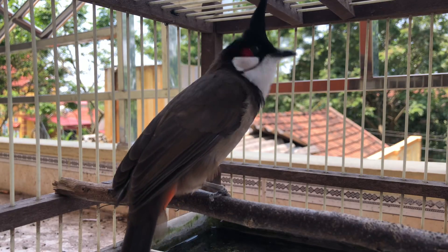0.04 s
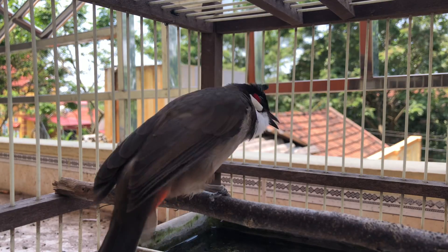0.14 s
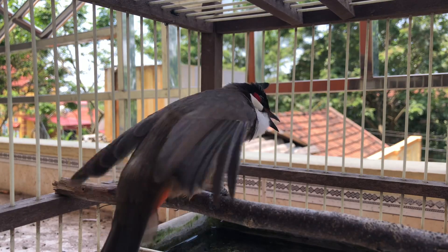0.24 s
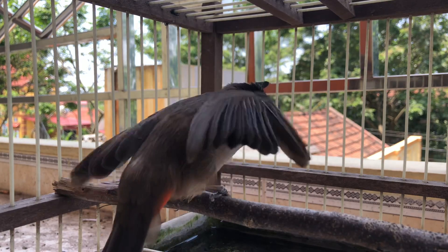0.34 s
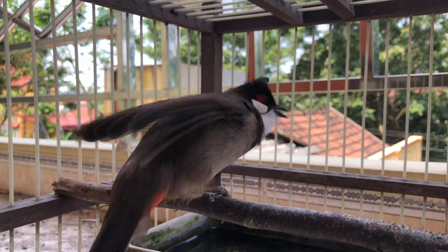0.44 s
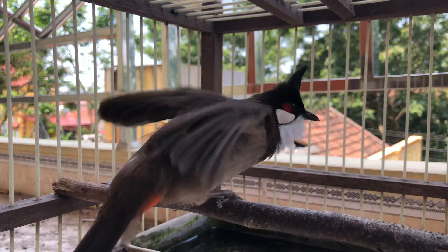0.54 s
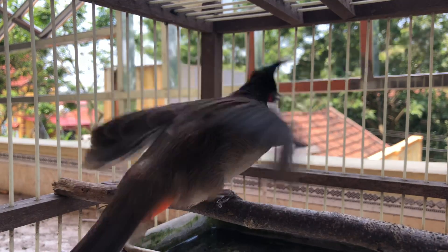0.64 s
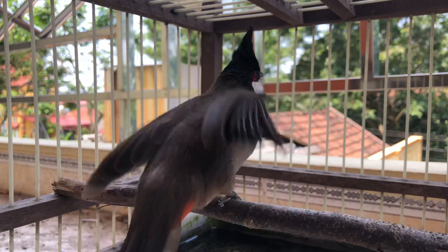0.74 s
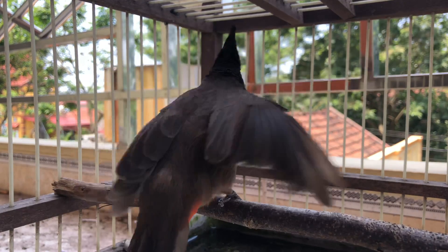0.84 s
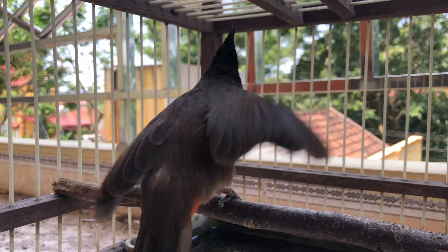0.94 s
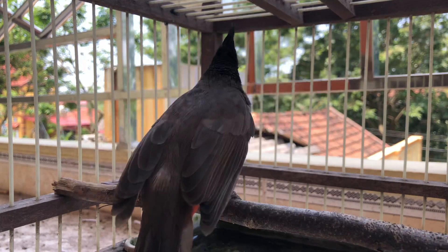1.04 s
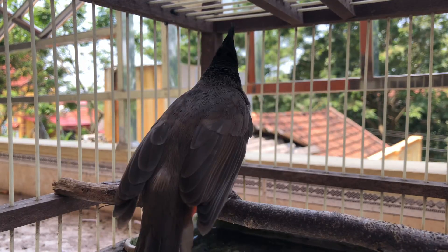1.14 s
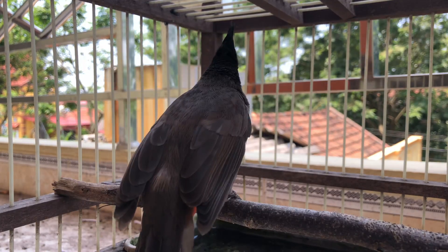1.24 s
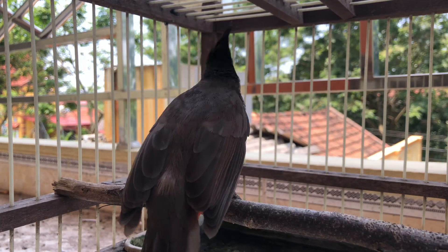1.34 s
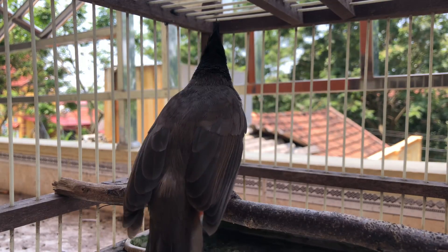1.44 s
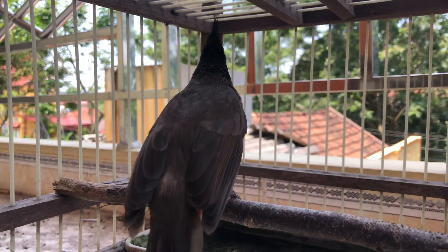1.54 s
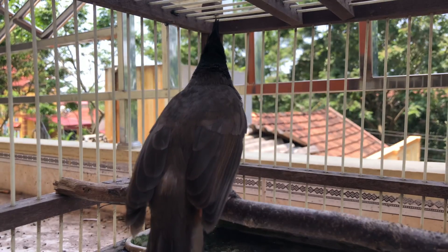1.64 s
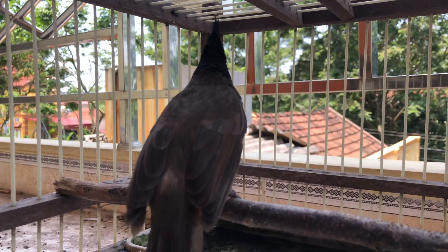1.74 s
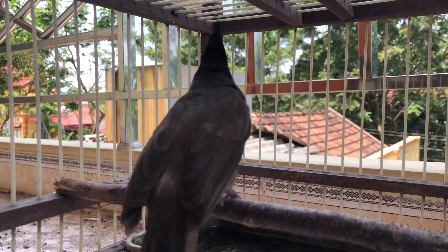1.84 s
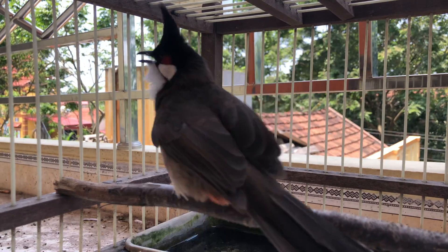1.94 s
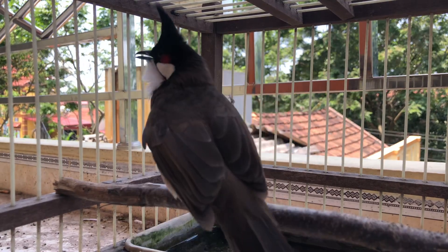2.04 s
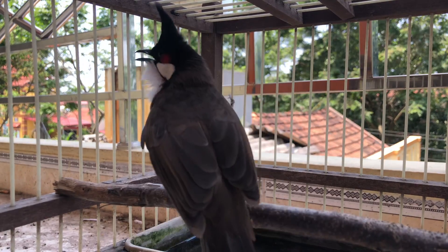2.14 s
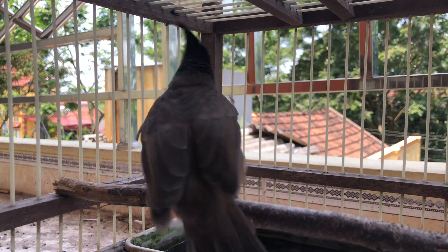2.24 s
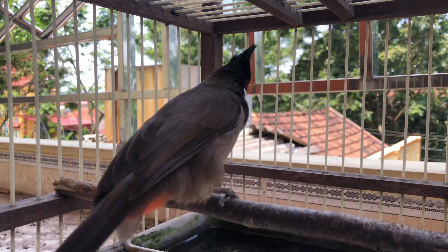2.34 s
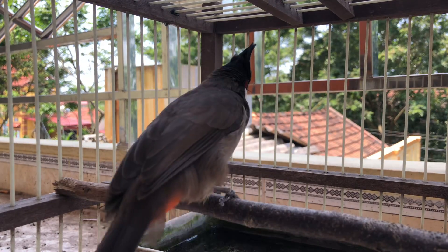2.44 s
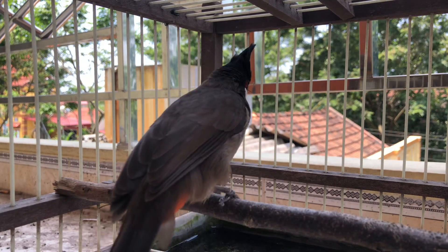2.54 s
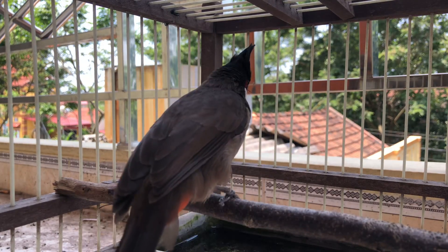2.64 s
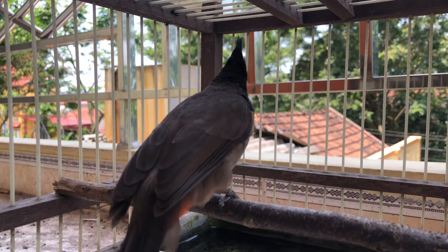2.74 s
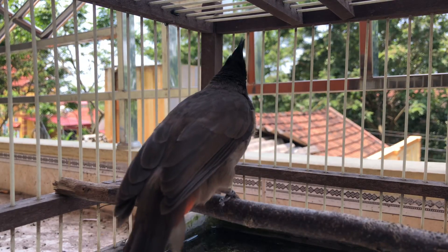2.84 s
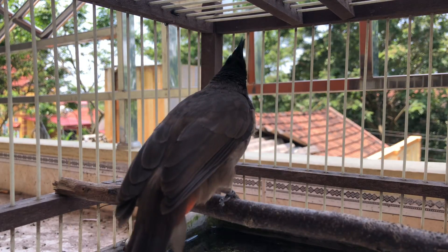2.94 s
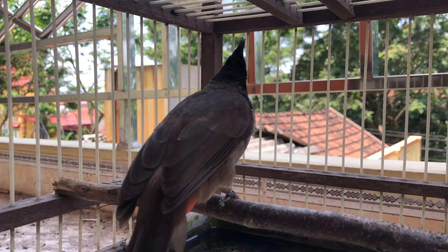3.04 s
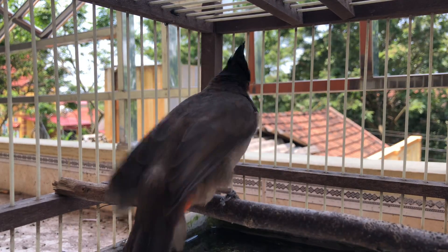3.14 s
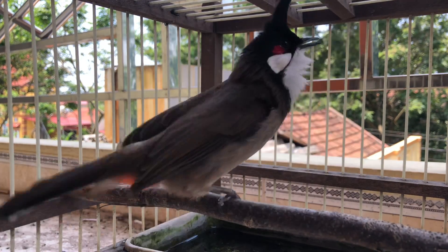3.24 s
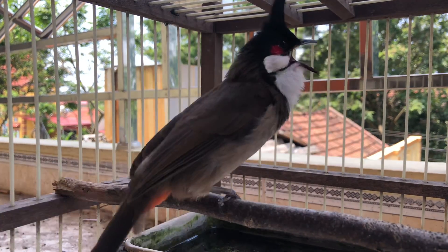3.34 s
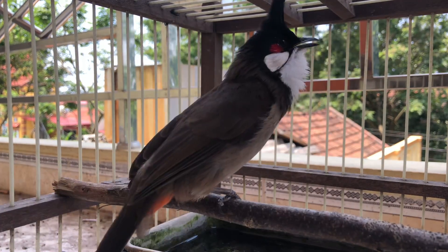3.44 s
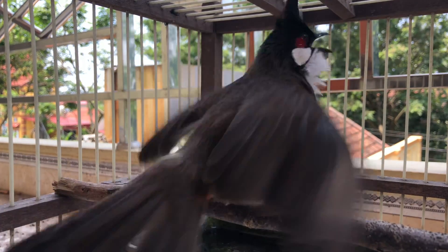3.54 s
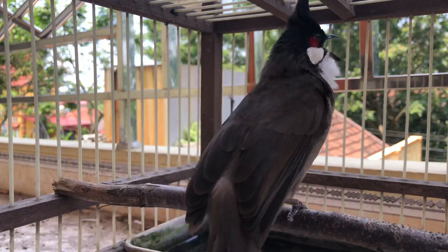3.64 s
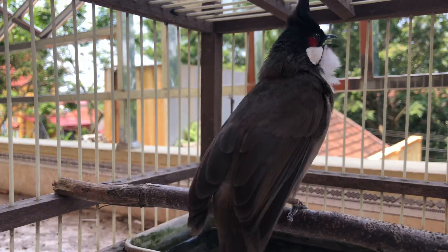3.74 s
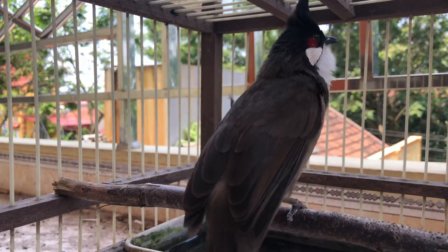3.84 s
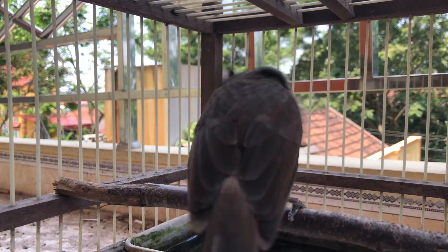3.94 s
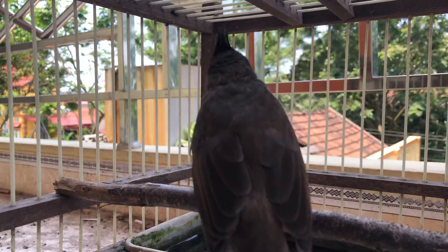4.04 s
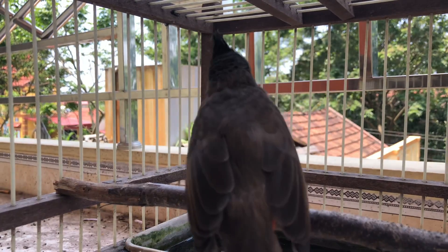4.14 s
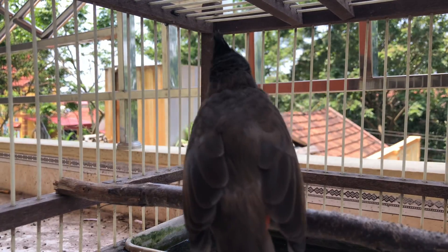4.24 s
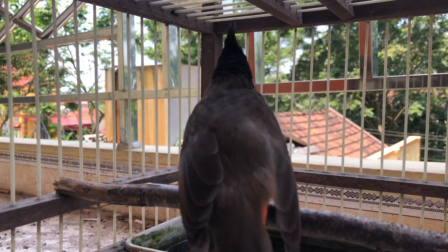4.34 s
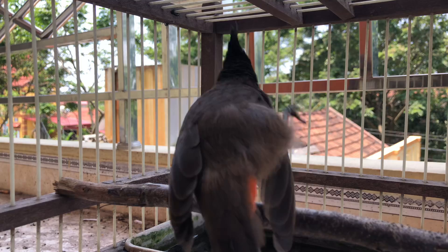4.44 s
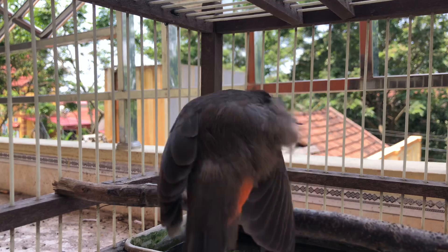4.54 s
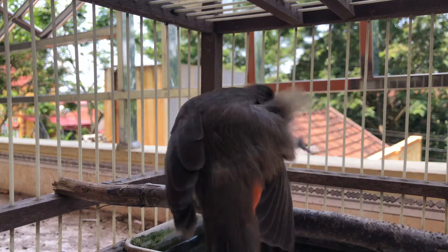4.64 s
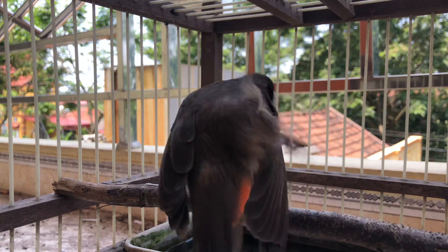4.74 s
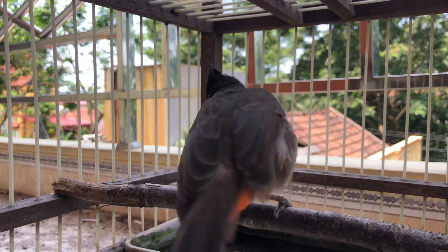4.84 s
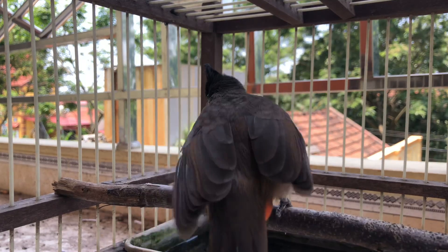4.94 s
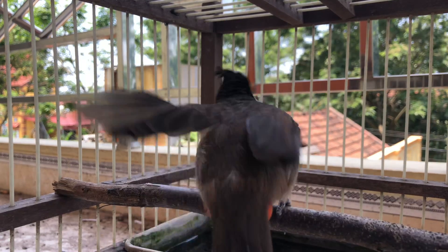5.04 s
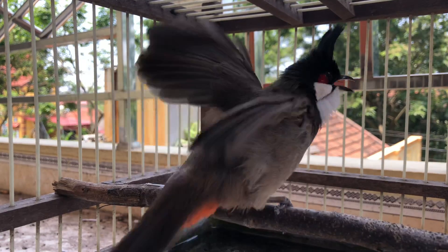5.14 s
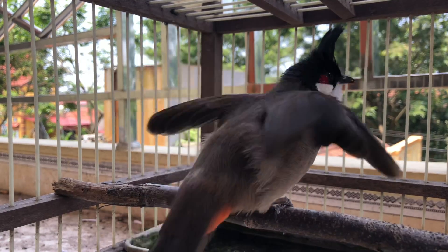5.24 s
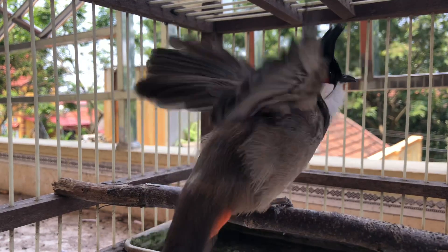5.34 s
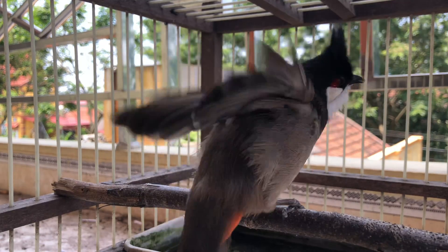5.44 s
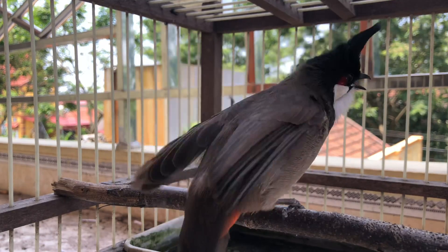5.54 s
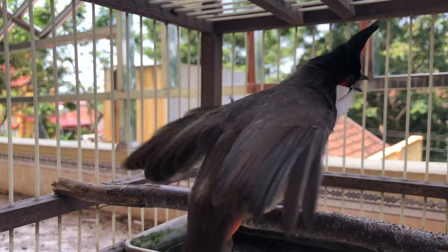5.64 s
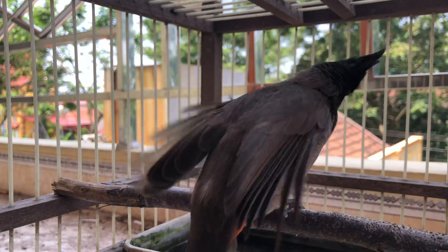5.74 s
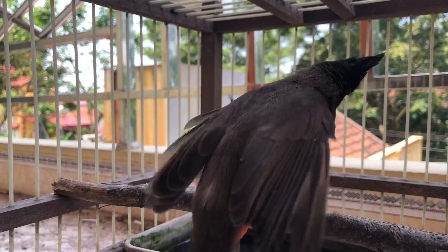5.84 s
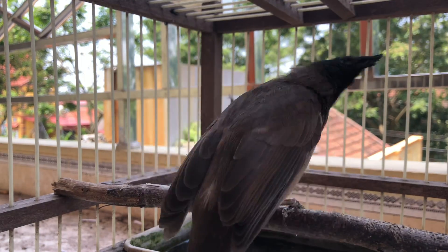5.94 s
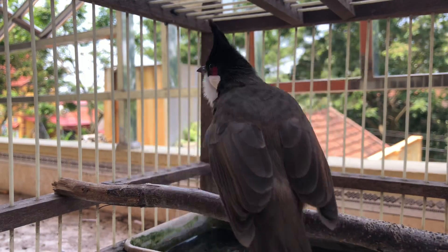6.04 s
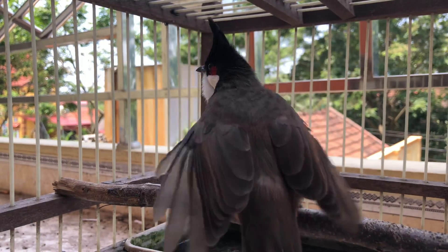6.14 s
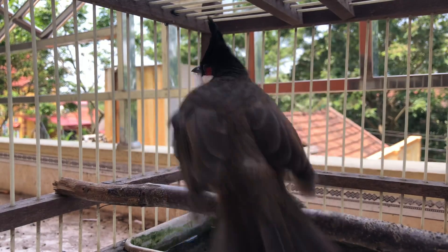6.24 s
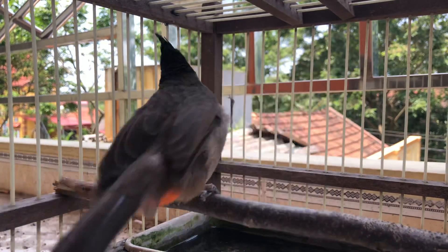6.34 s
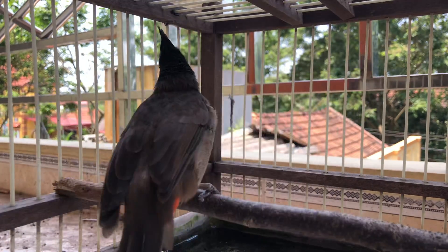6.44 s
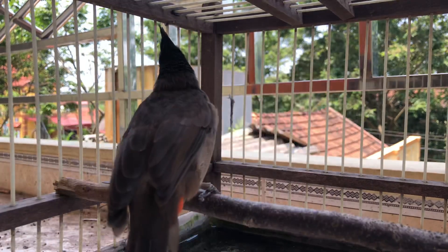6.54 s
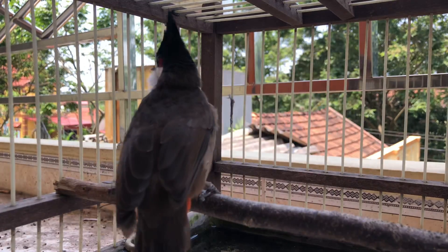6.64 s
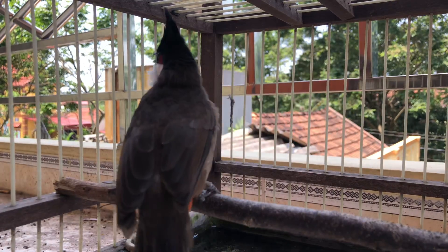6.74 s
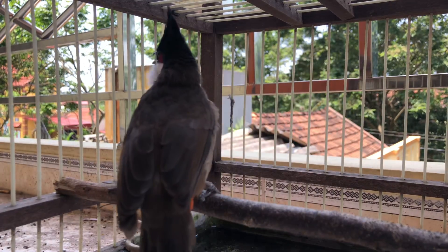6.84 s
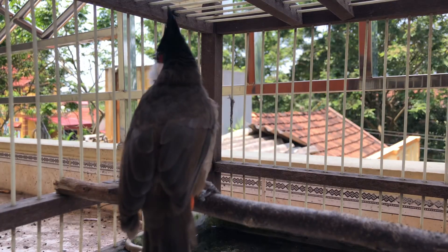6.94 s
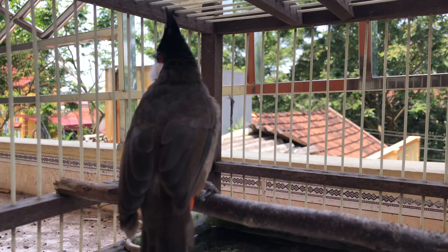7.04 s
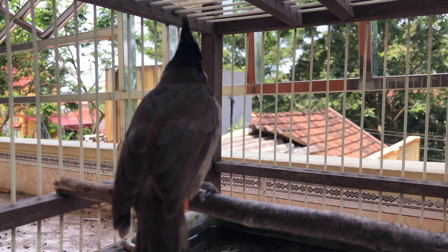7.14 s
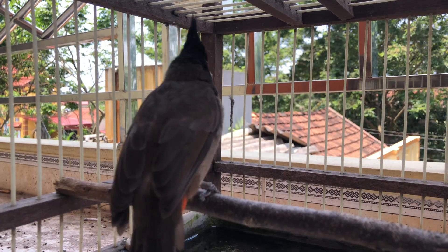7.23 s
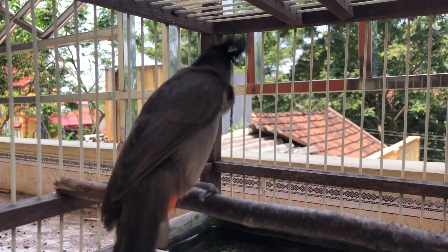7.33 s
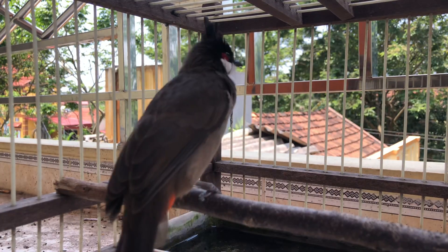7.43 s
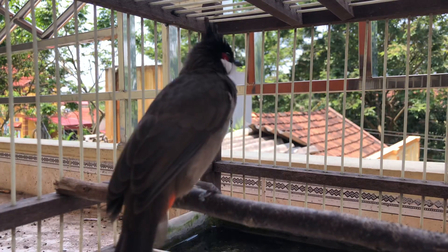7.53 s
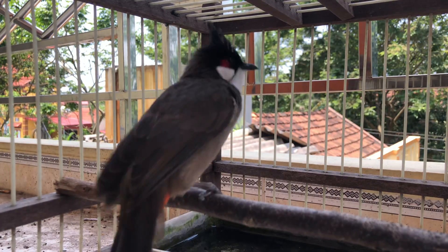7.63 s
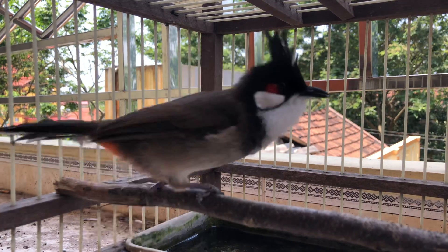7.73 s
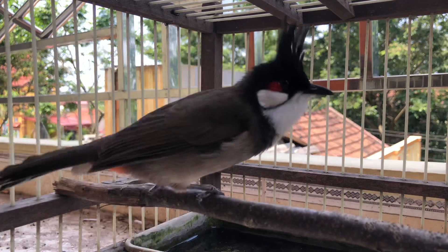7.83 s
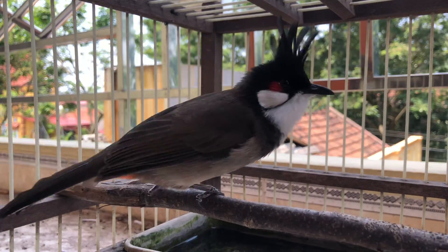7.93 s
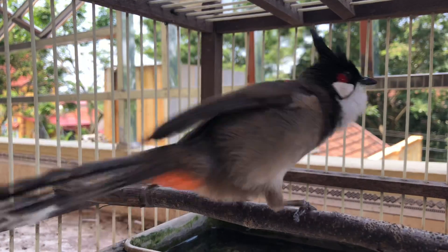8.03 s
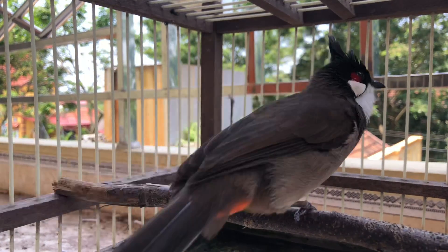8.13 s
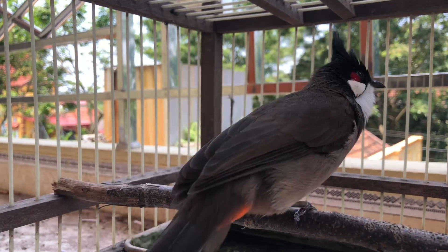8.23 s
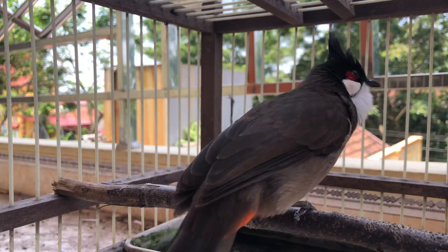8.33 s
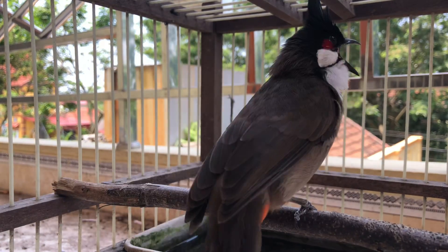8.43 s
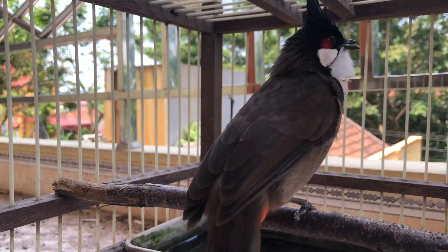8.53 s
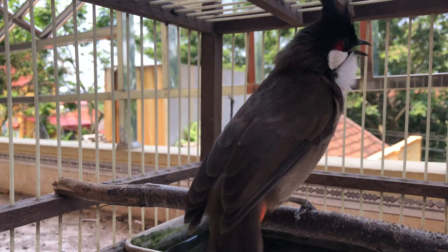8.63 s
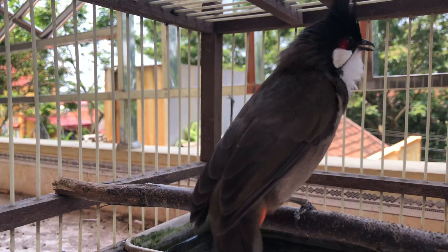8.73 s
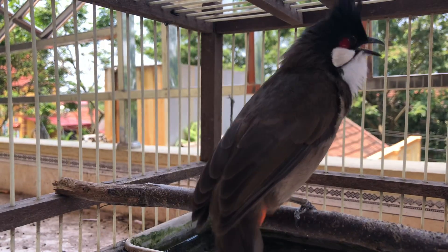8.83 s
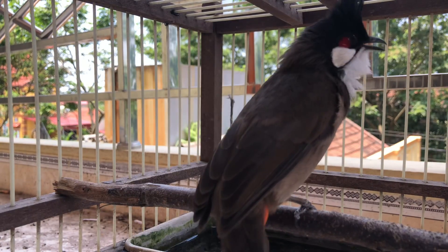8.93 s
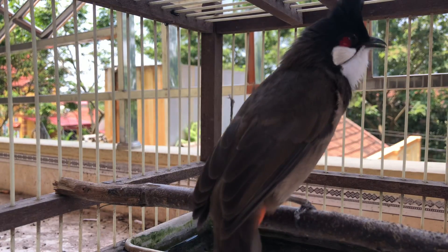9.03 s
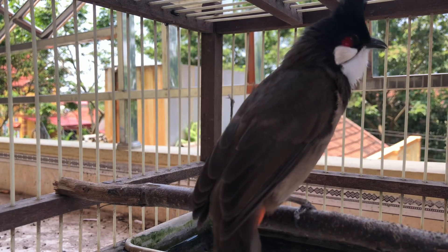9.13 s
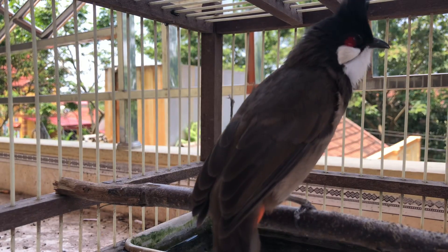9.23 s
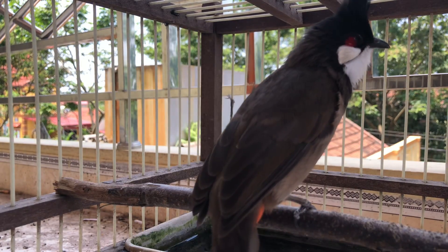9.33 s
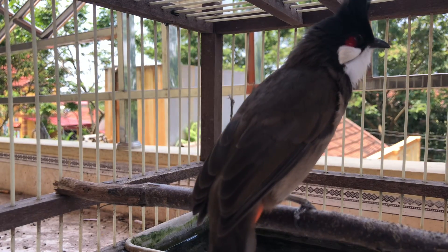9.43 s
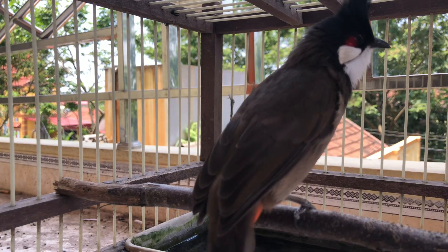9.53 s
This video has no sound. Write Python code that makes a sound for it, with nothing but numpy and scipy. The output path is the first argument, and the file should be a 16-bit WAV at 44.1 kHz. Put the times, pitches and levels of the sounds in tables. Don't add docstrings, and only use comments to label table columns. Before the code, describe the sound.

Short, clear, nearly pure bird whistles with a fluttering rasp, loud and close, throw quick echoes off nearby walls. Three similar phrases at about three, six and a half and eight and a half seconds stand out from quieter chucks, slides and squeaks. Dry feather and claw rustles and low air thumps come from the cage. Behind are reverberant distant birds, an early faint cockerel crow, soft leaves and a very low town murmur.

```python
import sys
import numpy as np
from scipy import signal
from scipy.fft import rfft, irfft, next_fast_len
from scipy.io import wavfile
from scipy.ndimage import uniform_filter1d, minimum_filter1d, map_coordinates

SR = 44100
rng = np.random.default_rng(int(sys.argv[2]) if len(sys.argv) > 2 else 0)


def how_loud(loudness_db):
    steps = np.asarray(loudness_db, float) / 20
    return 10 ** steps


def output_pcm(signal):
    pcm = np.clip(np.atleast_2d(signal).T, -1, 1) * 32767
    wavfile.write(sys.argv[1], SR, np.round(pcm).astype(np.int16))


N = 422478


def unit(x):
    return x / np.sqrt(np.mean(x ** 2) + 1e-20)


def along(points, hz):
    f, v = np.transpose(points)
    return np.interp(np.log(hz + 1), np.log(f + 1), v)


def wobble(rate, size):
    knots = rng.standard_normal(int(size * rate / SR) + 4)
    return map_coordinates(knots, [np.arange(size) * rate / SR])


def coloured(spectrum, size=N):
    m = next_fast_len(size)
    white = rfft(rng.standard_normal(m))
    return unit(irfft(white * how_loud(along(spectrum, np.fft.rfftfreq(m, 1 / SR))), m)[:size])


def add(track, s, sound):
    part = track[round(s * SR):][:len(sound)]
    part += sound[:len(part)]


# (frequency [Hz], level per Hz [dB])
HUM = [(20, -13), (42, -4), (99, 1), (228, -11), (500, -22), (1000, -45)]
# (time [s], level [dB])
TOWN = [(0, -56), (.7, -59), (1.1, -56.5), (2, -58.5), (3.1, -53.5), (3.8, -58.5), (5.1, -54.5),
        (5.9, -54.5), (6.8, -57.5), (8.1, -55), (8.7, -57.5), (9.58, -56.5)]
# (frequency [Hz], level per Hz [dB])
LEAVES = [(150, -40), (330, -22), (650, -21), (1500, -20), (2390, -19), (5000, -27), (8000, -36),
          (15800, -45)]


def town():
    s, db = np.transpose(TOWN)
    swell_db = np.interp(np.arange(N) / SR, s, db) + 1.4 * wobble(7, N) + wobble(1.5, N)
    leaves_db = -62 + wobble(3, N)
    return how_loud(swell_db) * coloured(HUM) + how_loud(leaves_db) * coloured(LEAVES)


# (time [s], length [s], pitch [Hz], level [dB], second partial level [dB])
CROWS = [(0, .08, 745, -57, -52), (.06, .17, 740, -64, -65), (.035, .1, 900, -59, -53),
         (4.94, .1, 500, -62, -80), (5.83, .16, 640, -68, -68), (7.65, .09, 750, -62, -75),
         (.19, .34, 736, -57, -59), (.5, .15, 715.5, -48, -48), (.65, 0.27, 714, -61, -58),
         (0.868, 1.24, 733.7, -64.5, -46.5), (5.815, 0.24, 960, -63, -80), (6.43, .18, 955, -66, -80),
         (9.3, .08, 640, -60, -64), (9.36, 0.13, 665, -58, -58), (9.478, 0.1, 624, -62, -66)]


def cockerels():
    attack_s, release_s, sag_db_per_s, sag_hz_per_s = .03, .07, 4.5, 5.5
    out = np.zeros(N)
    for s, length, hz, low_db, high_db in CROWS:
        t = np.arange(0, length, 1 / SR)
        waver = 1 + 0.0027 * wobble(40, len(t)) + .004 * wobble(9, len(t))
        phase = 2 * np.pi * np.cumsum((hz - sag_hz_per_s * t) * waver) / SR
        low = how_loud(low_db + 3.7 * wobble(35, len(t))) * np.sin(phase)
        high = how_loud(high_db + 1.8 * wobble(25, len(t))) * np.sin(2 * phase)
        edge = np.clip(np.minimum(t / attack_s, (length - t) / release_s), 0, 1)
        shape = how_loud(-sag_db_per_s * t) * np.sin(np.pi / 2 * edge) ** 2
        add(out, s, np.sqrt(2) * (low + high) * shape)
    return out


def glide(t, s, hz):
    step = np.diff(hz) / np.diff(s)
    a, b = step[:-1], step[1:]
    inner = np.where(a * b > 0, 2 * a * b / (a + b + 1e-9), 0)
    slope = np.r_[step[0], inner, step[-1]]
    i = np.clip(np.searchsorted(s, t, "right") - 1, 0, len(s) - 2)
    h = np.diff(s)[i]
    u = (t - s[i]) / h
    bend = slope[i] * (1 - u) ** 2 - slope[i + 1] * u * (1 - u) + step[i] * u * (3 - 2 * u)
    return hz[i] + h * u * bend


FLUTTERS = {"rise": (182, .05, 1.5, 3.6, .47, .3), "fall": (125, .015, 1.2, -1.2, 9, 0),
            "buzz": (122, .055, .5, 0, -9, 0), "squeak": (330, .04, 1.2, 0, 9, 0),
            "pip": (310, .08, 1.5, 0, 9, 0), "churr": (105, .055, 1.4, .2, -9, 0),
            "peep": (105, .065, 1.3, 0, -9, 0)}


def flutter(name, loose, done, slack_db, stretch):
    n = len(done)
    flutter_hz, swing, choke, settle, twice_from, wake = FLUTTERS.get(name, (0, 0, 0, 0, 9, 0))
    settled = settle * done ** (8 if settle > 0 else 2.5)
    depth = np.clip(loose * (1 - settled) + .01 * slack_db, 0, 1)
    depth = depth * np.clip(.3 + .7 * done / (wake + 1e-9), 0, 1)
    beat_hz = flutter_hz / stretch * (1 + .07 * wobble(60, n))
    beat = 2 * np.pi * (np.cumsum(beat_hz) / SR + rng.random())
    twice = np.clip((done - twice_from) / .15, 0, 1)
    turn = np.pi / 2 * (twice - twice[0])
    saw = -np.sin(beat + turn) - 0.19 * (1 - turn / 2) * np.sin(2 * beat)
    saw = saw - .3 * np.sin(turn) * np.cos(3 * beat)
    sweep = 2 * swing * depth * saw * (1 + .5 * np.sin(turn))
    snaps = (1 - twice) * np.cos(beat) + twice * np.cos(2 * beat)
    dip = np.clip(choke * depth * (1 - turn / 5), 0, 1) * snaps
    return depth, sweep, dip


# (multiple, level [dB])
OVERTONES = [(0.5005, -39), (1.501, -47), (2, -35), (2.5, -47), (2.998, -40), (3.5, -54), (4.002, -48.5),
             (4.5, -55), (5, -48), (5.5, -59), (6, -54), (7, -57), (8, -59), (9, -61)]
# (frequency [Hz], gain [dB])
THROAT = [(900, -14), (2600, 9.5), (3800, 5.5), (4700, -2), (6500, 7), (8700, 3), (11000, 20), (14500, 10)]
COLOURS = {"rise": (2.2, -4, 1.2, -45), "step": (2.5, -4, .7, -49), "flick": (10, -6, .3, -38),
           "snap": (3, -6, -1.2, -38), "fall": (3.5, -7, .5, -51), "chuck": (12, -8, -6, -28),
           "hump": (-11, -9, -5, -40), "whistle": (-10, -12, -12, -48), "high hump": (-11, -9, -5, -40),
           "high whistle": (-9, -12, -9, -48), "slide": (6, -12, -.5, -40), "buzz": (4, -3, -2.5, -33),
           "lift": (3, -8, -2, -34), "squeak": (5, 6, -5, -28), "pip": (1.5, -8, .8, -43),
           "churr": (3, -3, .6, -41), "peep": (3, -4, -.4, -48), "warble": (14, -10, -1.6, -37),
           "quaver": (6, -6, -1.2, -36)}
# (frequency [Hz], level [dB])
BREATH = [(800, -12), (1500, 1.5), (2500, 1.5), (5000, -4), (8500, -11), (11500, -3), (14000, -10),
          (16000, -20)]
OPENING_DB = {"chuck": 17, "slide": -7}


def throat_and_breath(name, hz, phase, depth, done, slack_db, bright_db):
    n = len(hz)
    overtone_db, halfway_db, tilt_db, hiss_db = COLOURS[name]
    breath_db = hiss_db + .4 * slack_db + 3 * wobble(150, n)
    upper = how_loud(breath_db) * coloured(BREATH, size=n)
    beak_db = OPENING_DB.get(name, 0) * (done - .5)
    for k, part_db in OVERTONES:
        if k * hz.min() > SR / 3:
            break
        throat_db = along(THROAT, k * hz) - along(THROAT, hz)
        own_db = overtone_db + bright_db + beak_db + tilt_db * max(k - 2, 0)
        own_db = own_db + halfway_db * (abs(k - round(k)) > .25)
        smear = (.1 + 1.9 * depth ** 2) * k * wobble(450, n)
        flicker_db = 3.5 * wobble(120, n)
        partial = np.sin(k * phase + smear) * (k * hz < SR / 2)
        upper += how_loud(part_db + own_db + throat_db + flicker_db) * partial
    return upper


# (time [s], pitch [Hz], level [dB])
STEP = [(0, 2940, -40), (.003, 2640, -12), (.006, 2305, -19), (.013, 2129, -14), (.022, 2199, -4.5),
        (.033, 2307, -6.5), (.036, 2500, -12), (.039, 2780, -6), (.07, 2779, -5.5), (.077, 2780, -11),
        (.082, 2784, -24)]
# (time [s], pitch [Hz], level [dB])
FLICK = [(0, 1295, -38.5), (.007, 1550, -19.5), (.019, 1920, -8), (.024, 1950, -17), (.027, 2700, -24)]
# (time [s], pitch [Hz], level [dB])
FALL = [(0, 3200, -34), (.004, 3050, -11), (.007, 2660, -20), (.011, 2780, -10), (.021, 2880, -9),
        (.024, 2359, -13.5), (.029, 2480, -7.5), (.055, 2340, -6), (.088, 2120, -9.5), (.113, 2030, -22)]
# (time [s], pitch [Hz], level [dB])
CHUCK = [(0, 1000, -56), (.012, 1290, -53), (.016, 1780, -34), (.024, 1800, -32.5), (.028, 1400, -35),
         (.033, 1370, -33), (.040, 1700, -32), (.05, 1480, -37), (.058, 1230, -48)]
# (time [s], pitch [Hz], level [dB])
WHISTLE = [(.083, 4240, -38), (.13, 3800, -32), (.168, 4200, -24), (.197, 4414, -39), (.22, 4796, -35.5),
           (.3, 6314, -51.5), (.328, 5820, -45), (.333, 4940, -57), (.337, 3830, -38)]
# (time [s], pitch [Hz], level [dB])
HIGH_WHISTLE = [(.057, 4046, -43), (.076, 3624, -34.5), (.125, 4030, -32), (.138, 4130, -46),
                (.167, 4517, -31.5), (.207, 4950, -45.5), (.27, 6200, -42.5), (.312, 5750, -48),
                (.321, 3800, -44)]
# (time [s], pitch [Hz], level [dB])
SLIDE = [(0, 896, -49.5), (.015, 1304, -28.5), (.059, 1593, -27), (.075, 1920, -31), (.1, 2260, -22.5),
         (.14, 2630, -22.5), (.157, 2552, -22), (.162, 2350, -28)]
# (time [s], pitch [Hz], level [dB])
BUZZ = [(0, 2250, -44), (.006, 2380, -28), (.013, 2350, -19.5), (.027, 2460, -17.5), (.042, 2460, -25),
        (.052, 2300, -36)]
# (time [s], pitch [Hz], level [dB])
LIFT = [(0, 2147, -36), (.018, 2030, -27), (.023, 2197, -29.5), (.027, 3500, -25), (.032, 3980, -23),
        (.041, 3800, -19), (.052, 3750, -40.5)]
# (time [s], pitch [Hz], level [dB])
SQUEAK = [(0, 3500, -42), (.005, 3750, -24), (.01, 3825, -16.5), (.016, 4050, -29.5), (.019, 3900, -24),
          (.023, 3700, -38)]
# (time [s], pitch [Hz], level [dB])
PIP = [(0, 3546, -29.5), (.008, 3530, -13.5), (.016, 3482, -7.5), (.025, 3453, -6), (.04, 3430, -9),
       (.045, 3118, -15), (.049, 2593, -21.5)]
# (time [s], pitch [Hz], level [dB])
CHURR = [(0, 1778, -42), (.014, 2329, -14.5), (.029, 2529, -7), (.079, 2590, -7.5), (.086, 2706, -10.5),
         (.104, 3170, -7), (.112, 3330, -13), (.128, 3400, -17.5), (.138, 3200, -23)]
# (time [s], pitch [Hz], level [dB])
WARBLE = [(0, 883, -51.5), (.01, 1196, -36.5), (.014, 2013, -27), (.026, 2008, -28), (.03, 1350, -30),
          (.045, 1147, -34), (.065, 1085, -46)]
# (time [s], pitch [Hz], level [dB])
SNAP = [(.025, 2396, -24), (.027, 3177, -8), (.03, 3226, -17), (.033, 3050, -5.5), (.035, 3290, -6.5),
        (.037, 3820, -25), (.046, 3210, -24.5)]
# (time [s], pitch [Hz], level [dB])
HUMP = [(0, 2280, -53), (.015, 3510, -41.5), (.045, 4800, -52.5), (.08, 4400, -53)]
# (time [s], pitch [Hz], level [dB])
HIGH_HUMP = [(0, 4400, -67), (.012, 5200, -50.5), (.03, 5600, -48.5), (.057, 4150, -49.5)]
# (time [s], pitch [Hz], level [dB])
PEEP = [(.136, 3066, -21.5), (.145, 3087, -6.5), (.155, 3090, -4), (.18, 3110, -27.5)]
# (time [s], pitch [Hz], level [dB])
QUAVER = [(.065, 1143, -47), (.091, 1944, -26), (.098, 1846, -32.5), (.103, 1506, -27.5), (.113, 1506, -29),
          (.119, 2340, -24.5), (.125, 1950, -24.5), (.131, 2384, -27.5), (.142, 2003, -33)]
VOICES = {"rise": (None, .66), "step": (STEP, .1), "flick": (FLICK, .2), "snap": (SNAP, .55),
          "fall": (FALL, .17), "chuck": (CHUCK, .42), "hump": (HUMP, .2), "whistle": (WHISTLE, .1),
          "high hump": (HIGH_HUMP, .2), "high whistle": (HIGH_WHISTLE, .1), "slide": (SLIDE, .08),
          "buzz": (BUZZ, .85), "lift": (LIFT, .3), "squeak": (SQUEAK, .55), "pip": (PIP, .2),
          "churr": (CHURR, .42), "peep": (PEEP, .08), "warble": (WARBLE, .05), "quaver": (QUAVER, .15)}
DROPPING = {"rise", "step", "snap", "fall", "whistle", "high whistle", "slide", "pip"}
# (length [s], end pitch [Hz], loss [dB])
DROP = (.011, 1020, 30)
DROP_KNEE = (.35, 1.55, .6)


def syllable(name, stretch=1, pitch=1, rows=None, bright_db=0):
    rows, loose = rows or VOICES[name][0], VOICES[name][1]
    if name in DROPPING:
        last_s, _, last_db = rows[-1]
        knee = np.multiply(DROP, DROP_KNEE)
        rows = rows + [(last_s + after, hz, last_db - loss) for after, hz, loss in (knee, DROP)]
    s, hz, db = np.transpose(rows)
    length = s[-1] - s[0]
    t = s[0] + np.arange(round(length * stretch * SR)) / SR / stretch
    n, done = len(t), (t - s[0]) / length
    hz, db = pitch * glide(t, s, hz), np.interp(t, s, db)
    slack_db = db.max() - db
    depth, sweep, dip = flutter(name, loose, done, slack_db, stretch)
    hz = hz * (1 + sweep + (.003 + .012 * depth ** 2) * wobble(450, n))
    level = how_loud(db + (.6 + 2.5 * depth) * wobble(200, n))
    level = level * (1 + .25 * depth ** 2 * wobble(900, n))
    phase = 2 * np.pi * np.cumsum(hz) / SR
    upper = throat_and_breath(name, hz, phase, depth, done, slack_db, bright_db)
    voice = (1 - dip) * np.sin(phase) + (1 - dip / 2) * upper
    sound = np.sqrt(2) * level * voice * signal.windows.tukey(n, .003 / length)
    return np.pad(sound, (round(s[0] * stretch * SR), 0))


# (time [share of length], level [dB])
RISE = [(0, -47), (.09, -29.5), (.16, -17), (.29, -8.5), (.9, -7.5), (.94, -11), (.965, -24), (.99, -13),
        (1.02, -27)]
# (time [s], length [s], top pitch [Hz], climb time [s], gain [dB])
RISES = [
    (3.264, .113, 3480, .025, .2),
    (6.396, .106, 3700, .024, -1.2),
    (8.39, .12, 3690, .035, .4),
]
# (syllable, time [s], gain [dB], stretch [ratio])
ANSWERS = [("step", 3.51, .3, 1.01), ("flick", 3.636, .3, .99), ("snap", 3.636, .3, .98),
           ("fall", 3.726, .2, 1.01), ("step", 6.623, -.5, 1.01), ("flick", 6.752, -4, 1.01),
           ("snap", 6.754, -.5, 1.01), ("fall", 6.845, -.4, .99), ("step", 8.645, .3, 1.05),
           ("flick", 8.776, -2.5, 1.04), ("snap", 8.776, .3, 1.02), ("fall", 8.872, -.3, .93)]
# (syllables, time [s], gain [dB], stretch [ratio], pitch [ratio])
CALLS_SUNG = [(["hump", "whistle"], .088, -1, 1, 1), (["slide"], .538, .5, .99, 1.03), (["buzz"],
              .784, -2, 1, 1), (["lift"], .836, 2, .96, 1), (["squeak"], .846, -7, .9, 1.09), (["pip"],
              1.985, -1, 1, 1), (["churr", "peep"], 2.11, -1, 1, 1), (["buzz"], 5.113, -6, .95, 1),
              (["lift"], 5.168, -2.5, .9, 1.04), (["squeak"], 5.174, .5, 1, 1), (["warble", "quaver"],
              5.3, 0, .97, 1), (["high hump", "high whistle"], 5.535, -1, 1, 1)]
# (time [s], gain [dB], stretch [ratio], pitch [ratio], overtones [dB])
CHUCKS = [(1.36, 2, .95, 1, 0), (2.685, 4, .98, 1, -4), (2.93, -17, 1, .95, 8), (4.11, -.5, .98, .96, 0),
          (4.304, 0, .99, .97, 0), (4.6, .5, .92, 1, 0), (4.84, 2, .95, .97, 0), (6.078, -2, .95, 1, 3),
          (7.73, 4.5, 1, 1.04, 2), (8.041, 3, .99, 1, 0)]


def bulbul():
    from_hz = 1200
    out = np.zeros(N)
    for s, length, top_hz, climb, db in RISES:
        rows = []
        for u, level in RISE:
            short_hz = (top_hz - from_hz) * np.exp(-u * length / climb)
            rows.append((u * length, top_hz - short_hz, level))
        add(out, s, how_loud(db) * syllable("rise", rows=rows))
    for name, s, db, stretch in ANSWERS:
        add(out, s, how_loud(db) * syllable(name, stretch))
    for names, s, db, stretch, pitch in CALLS_SUNG:
        for name in names:
            add(out, s, how_loud(db) * syllable(name, stretch, pitch))
    for s, db, stretch, pitch, bright_db in CHUCKS:
        add(out, s, how_loud(db) * syllable("chuck", stretch, pitch, bright_db=bright_db))
    return out


# (delay [s], level [dB])
WALLS = [(.006, -16), (.013, -19), (.047, -23), (.09, -32)]


def walls(song):
    out = np.zeros(N)
    for s, db in WALLS:
        facets = rng.standard_normal(SR // 10)[:3 + round(.12 * s * SR)]
        add(out, s, how_loud(db) * signal.fftconvolve(song, facets / np.linalg.norm(facets)))
    return out


def yard(x, decays, delay):
    out = np.zeros(N)
    for start in range(0, N, SR // 2):
        piece = x[start:start + SR // 2]
        if not piece.any():
            continue
        hz, t, z = signal.stft(rng.standard_normal(3 * SR // 2), SR, nperseg=256)
        swell = 1 - np.exp(-t / delay)
        decay = how_loud(-60 * t / along(decays, hz)[:, None])
        tail = signal.istft(z * swell * decay, SR, nperseg=256)[1]
        add(out, start / SR, signal.fftconvolve(piece, tail / np.linalg.norm(tail)))
    return out


def puffs(rows, spectrum, grain_hz):
    shape = np.zeros(N)
    for s, length, db in rows:
        add(shape, s, how_loud(db) * signal.windows.tukey(round(length * SR), .8))
    return shape * coloured(spectrum) * how_loud(3 * wobble(grain_hz, N))


# (time [s], length [s], level [dB])
RUSTLES = [(0.254, 0.007, -52), (.258, .12, -56), (.32, 0.04, -59), (.48, .025, -65), (.59, .09, -64),
           (1.28, 0.037, -65), (1.885, 0.09, -59), (3.18, 0.035, -54.5), (3.235, .015, -55),
           (4.36, 0.056, -64.5), (4.5, .075, -60), (4.585, .02, -65), (4.69, .03, -63), (4.76, .03, -63),
           (5.07, .035, -60), (.528, .028, -51), (.09, .06, -67), (5.17, .03, -55), (5.33, .03, -58),
           (.84, .03, -57), (6.268, 0.11, -55), (7.31, 0.045, -60), (7.66, 0.12, -56), (7.991, 0.05, -55)]
# (frequency [Hz], level [dB])
FEATHERS = [(300, -23.5), (2000, -5), (6000, 1.5), (12000, 0), (16000, -19)]
# (time [s], length [s], level [dB])
GUSTS = [(3.2, 0.07, -50), (3.57, 0.069, -50), (5.3, 0.23, -64), (6.28, 0.11, -49.5), (7.05, .08, -49),
         (7.3, 0.24, -47.5), (7.915, .09, -51), (8.02, 0.16, -54), (8.37, .08, -55)]
# (frequency [Hz], level [dB])
AIR = [(20, -24), (45, 4), (120, 6), (250, -7), (600, -25), (2000, -67)]


def rustle():
    return puffs(RUSTLES, FEATHERS, grain_hz=185) + puffs(GUSTS, AIR, grain_hz=30.05)


# (time [s], length [s], start pitch [Hz], end pitch
# [Hz], level [dB])
RIVALS = [(0.321, .05, 3240, 3880, -50), (.85, .02, 4200, 4350, -46), (1.271, 0.036, 1447, 1720, -56),
          (1.684, .09, 3300, 3550, -33), (1.72, .07, 3000, 2800, -40), (1.754, 0.079, 2213, 2710, -47),
          (1.843, 0.082, 2817, 2434, -28.5), (1.919, 0.055, 3000, 3935, -26.5),
          (2.332, .04, 1300, 1588, -58.5), (2.528, 0.029, 1238, 1590, -55.5), (2.775, .18, 4090, 6300, -54),
          (2.84, 0.22, 4330, 4543, -54), (2.88, 0.24, 5110, 5510, -55.5), (2.93, .2, 5900, 6100, -59),
          (7.5, .14, 2450, 2200, -54), (4.253, 0.7, 5800, 4500, -67), (5.731, .04, 2300, 2700, -61),
          (6.316, 0.045, 3450, 3250, -33), (6.35, .05, 3000, 3700, -30), (6.375, .04, 3500, 2800, -33),
          (6.44, .12, 3500, 2900, -27), (6.499, 0.11, 2697, 2540, -23), (7.207, 0.04, 1350, 1500, -69),
          (8.2, 0.16, 5720, 4400, -69), (9.115, 0.038, 1310, 1653, -61), (9.406, 0.052, 6600, 5020, -50.5),
          (9.441, 0.13, 5330, 4900, -52.5), (9.47, 0.12, 5980, 5840, -53)]


def rivals():
    out = np.zeros(N)
    for s, length, from_hz, to_hz, db in RIVALS:
        n = round(length * SR)
        hz = np.linspace(from_hz, to_hz, n) * (1 + .056 * wobble(170, n))
        whistle = np.sin(2 * np.pi * np.cumsum(hz) / SR)
        add(out, s, how_loud(db) * whistle * signal.windows.tukey(n, .4))
    return out


# (frequency [Hz], time to fall 60 dB [s])
YARD = [(800, .7), (1500, 0.86), (2400, 1.374), (3500, 1.43), (5000, 0.18), (10000, 0.75)]
# (frequency [Hz], time to fall 60 dB [s])
FAR = [(1500, 2.4), (2400, 1.1), (3500, 1.6), (5000, 1), (8000, 0.49)]


def scene():
    song, far = how_loud(1.0) * bulbul(), rivals()
    near = song + walls(song) + how_loud(-22.5) * yard(song, YARD, delay=0.04)
    distant = how_loud(-10.0) * far + how_loud(4) * yard(far, FAR, delay=0.0052)
    return (near + distant + cockerels() + rustle() + town())[None]


def band_limit(x):
    return signal.sosfilt(signal.butter(12, 15940, fs=SR, output="sos"), x)


def record(dry):
    x = signal.sosfilt(signal.butter(4, 38, "high", fs=SR, output="sos"), dry)
    needed = np.minimum(1, .9 / (np.abs(x) + 1e-9))
    gain = uniform_filter1d(minimum_filter1d(needed, size=65), size=33)
    return band_limit(x * gain)


dry = scene()
out = record(dry)
output_pcm(out)
```